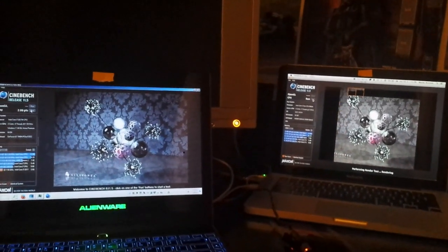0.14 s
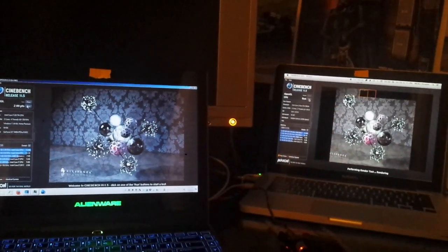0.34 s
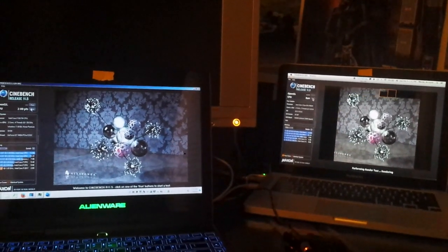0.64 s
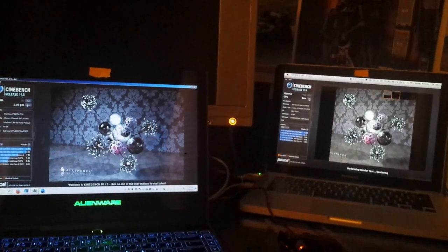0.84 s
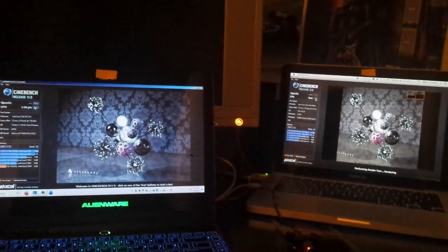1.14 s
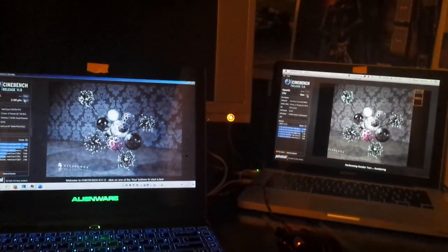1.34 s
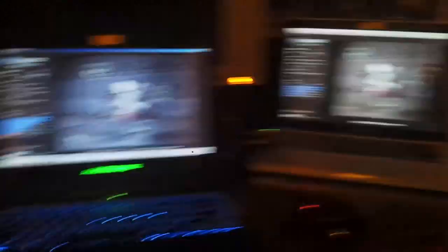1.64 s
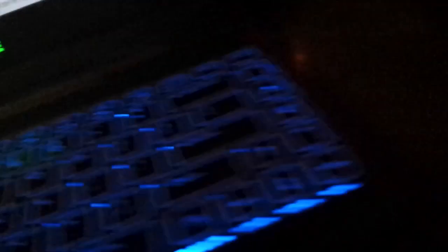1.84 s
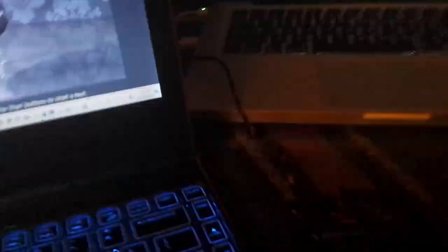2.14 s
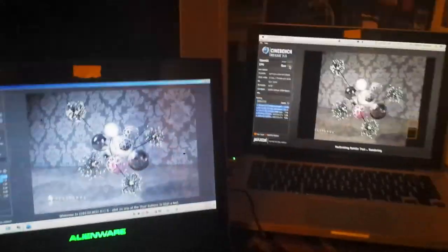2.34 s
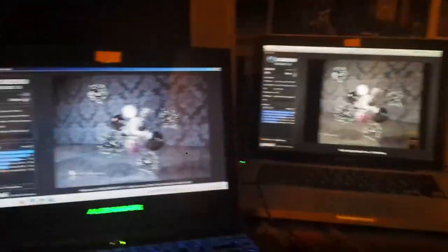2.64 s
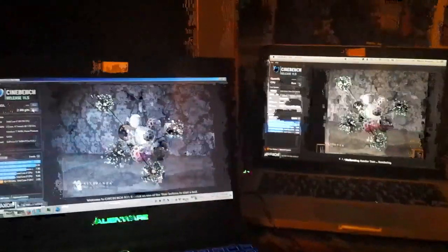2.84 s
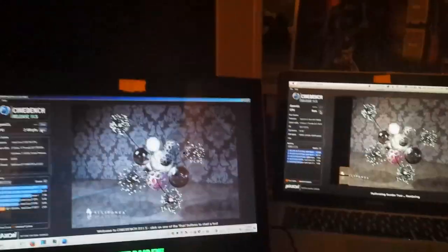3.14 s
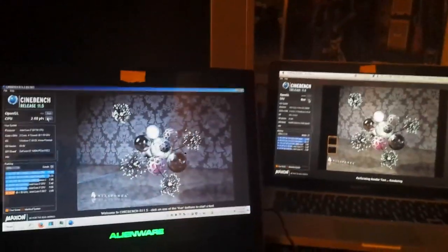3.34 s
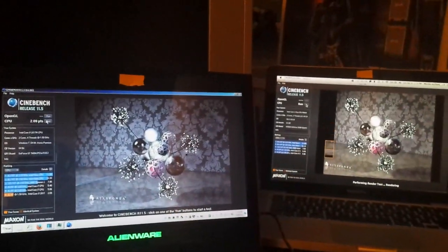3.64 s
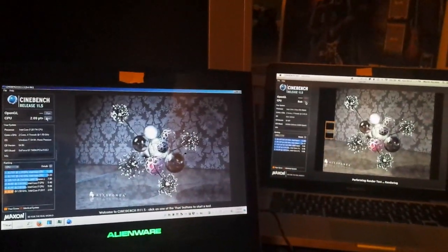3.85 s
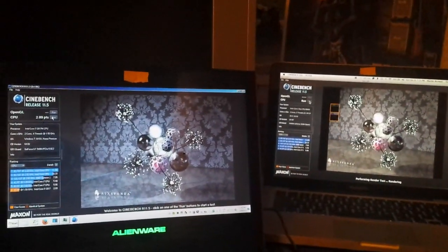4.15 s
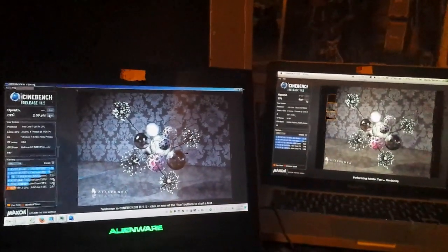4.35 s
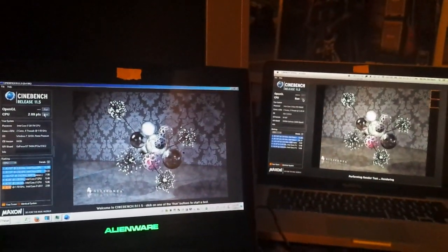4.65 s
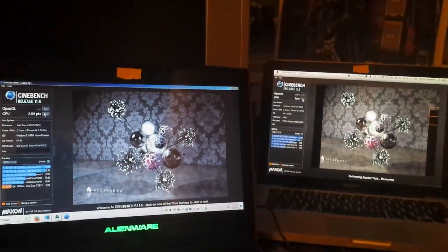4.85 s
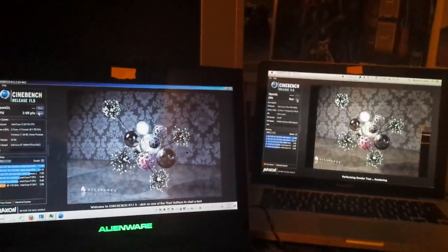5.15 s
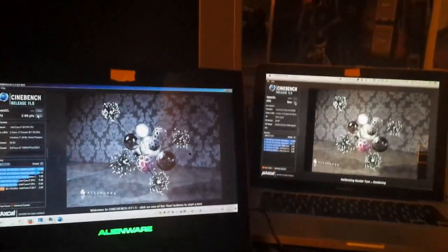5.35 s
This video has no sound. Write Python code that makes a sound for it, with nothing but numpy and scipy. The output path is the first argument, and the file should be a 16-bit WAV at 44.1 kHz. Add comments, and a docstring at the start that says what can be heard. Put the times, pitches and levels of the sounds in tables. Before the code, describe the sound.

Two laptop fans under heavy load run continuously, close to a hand-held camera in a quiet, fairly dry room. Broad airy hiss carries thin steady whines, a middle pair beating rapidly, with higher pitches above. From 1.1 to 1.6 s there are only very faint soft finger bumps and a tiny tick. At 1.7 s a sharp plastic click starts the camera's swoop; a strong tick follows at 1.84 s, then rubbing, scuffs, dull bumps and small clicks crowd together until about 2.65 s. Meanwhile the hiss changes colour, the whines dip and move between sides, and louder handling briefly ducks everything. Afterwards the fans settle, slightly thinner and with a weaker middle whine. A tick sounds right of centre at 3.1 s. Around 4 s a quiet tone glides down and throbs against its neighbour. Small clicks and a very short creak come at 4.6 to 4.85 s, then steady fans to the end at about 5.5 s.

```python
"""Two laptops under full load blow their fans in a quiet room, close to a hand-held camera.
Turbulent air hisses through resonant vents; blade tones whine, and tones of nearly equal pitch beat.
One blade tone glides down and throbs against its neighbour.
The camera swoops to a keyboard and settles farther back, which reshapes the hiss and the whines.
Its case ticks (struck modes), bumps, rubs (tiny catches) and creaks (stick-slip) in the hand."""
import sys
import numpy as np
from scipy import signal
from scipy.fft import rfft, irfft
from scipy.io import wavfile

SR = 44100
rng = np.random.default_rng(int(sys.argv[2]) if len(sys.argv) > 2 else 0)


def int16_out(signal):
    """Quantize to a 16-bit WAV file."""
    q = np.round(np.clip(np.atleast_2d(signal).T, -1, 1) * 32767)
    wavfile.write(sys.argv[1], SR, q.astype(np.int16))


N = 242991
TIME, FREQS = np.arange(N) / SR, np.fft.rfftfreq(N, 1 / SR)

# the camera's path:
# (time [s], place [1 = first, 0 = second], closeness to the keyboard [0-1])
CAMERA_PATH = [(0, 0.99, 0.14), (1.7, 0.97, 0.17), (1.85, 1, 1), (2.0, 0.39, 0.8), (2.33, 0.034, 0.97),
               (2.5, 0.031, 0.7), (2.75, 0.081, 0.52), (3.2, 0, 0.3), (5.0, 0, 0.14), (5.5, 0.089, 0.3)]


def gain_of(db):
    """Level law: amplitude is ten to the power of decibels over twenty."""
    return 10 ** (np.asarray(db) / 20)


def evened(x):
    """Normalisation to unit rms, the root of the mean power."""
    return x / np.sqrt(np.mean(x ** 2) + 1e-20)


def spectrum(points, hz=FREQS):
    """Spectral envelope: each column of a table interpolated along log frequency."""
    table_hz, *columns = np.transpose(points)
    return np.squeeze([np.interp(np.log(hz + 1), np.log(table_hz), c) for c in columns])


def curve(rows, t=TIME):
    """Time envelope: each column of a table interpolated along time."""
    s, *columns = np.transpose(rows)
    return np.squeeze([np.interp(t, s, c) for c in columns])


def sides(pan_db):
    """Level-difference stereo: left and right gains half the difference above and below."""
    return gain_of([[pan_db / 2], [-pan_db / 2]])


def add(mix, s, sound, pan_db=0):
    """Superposition: adds a mono sound at a time in seconds and a left-right difference in dB."""
    part = mix[:, round(s * SR):][:, :len(sound)]
    part += sides(pan_db) * sound[:part.shape[1]]


def drift(rate_hz):
    """Low-passed noise: a slow random motion of about unit rms, weak above its rate."""
    coarse = rng.standard_normal(N // 100)
    hz = np.fft.rfftfreq(len(coarse), TIME[-1] / len(coarse))
    slow = irfft(rfft(coarse) / (1 + (hz / rate_hz) ** 2), len(coarse))
    return np.interp(TIME, np.linspace(0, TIME[-1], len(slow)), evened(slow - slow.mean()))


def ring(hz, t60):
    """Damped mode: a sinusoid whose exponential decay loses 60 dB in t60 seconds."""
    t = TIME[:SR // 10]
    return np.sin(2 * np.pi * hz * t) * np.exp(-np.log(1000) * t / t60)


def minimum_phase(points, size=512):
    """Minimum phase: the Hilbert transform of log gain gives the most front-loaded impulse."""
    hz = abs(np.fft.fftfreq(size, 1 / SR))
    log_gain = np.log(gain_of(spectrum(points, hz)))
    pulse = np.fft.ifft(np.exp(np.conj(signal.hilbert(log_gain)))).real
    return pulse / abs(pulse).max()


def thinned(x, hz):
    """Radiation efficiency: small plastic parts radiate almost no bass."""
    return signal.sosfilt(signal.butter(3, hz, "highpass", fs=SR, output="sos"), x)


def room(x, t60=0.17, wet_db=-17):
    """Reverberation: desk and walls scatter a short, faint, exponentially decaying tail."""
    t = TIME[:SR // 3]
    decay = np.exp(-np.log(1000) * t / t60)
    tail = rng.standard_normal((2, len(t))) * decay * (t > .004)  # 4 ms before the first scatter
    tail /= np.linalg.norm(tail[0])
    return x + gain_of(wet_db) * signal.fftconvolve(x, tail, axes=1)[:, :N]


def creak(pan_db=1, jitter=.04):
    """Stick-slip: jerks of the grip ring the case, slowing and weakening as strain is spent."""
    # modes of the case: (frequency [Hz], t60 [s], relative level [dB])
    case_modes = [(970, .02, -10), (1280, .007, 0), (1730, .009, 0), (2380, .006, -16), (3600, .004, -21)]
    start_s, length_s = 4.7288, .0172
    first_per_s, last_per_s = 658, 260  # rate of the slips
    first_db, fade_db = -11, -9.5  # peak of a slip before bass thinning, and its change by the end
    knee = 2.5  # higher = the slips hold steady for longer

    body = sum(gain_of(db) * ring(hz, t60) for hz, t60, db in case_modes)
    body = np.convolve(body, signal.windows.hann(13))  # softens each jerk
    body = body / abs(body).max()
    out, since = np.zeros((2, N)), 0
    while since < length_s:
        spent = (since / length_s) ** knee
        add(out, start_s + since, gain_of(first_db + fade_db * spent) * body, pan_db)
        slips_per_s = first_per_s + (last_per_s - first_per_s) * spent
        since += np.exp(jitter * rng.standard_normal()) / slips_per_s
    return out


def bumps(low_hz=290, high_hz=390, t60=0.059, soft_s=0.0044, pan_db=2):
    """Soft impact: a slow contact lets fingertips excite two low modes of the camera."""
    # soft bumps of the fingers: (time [s], gain on the two modes [dB])
    touches = [(1.093, -46), (1.253, -38), (1.527, -42), (1.606, -34.5), (1.839, -54), (2.014, -37),
               (2.095, -30), (2.168, -41), (2.321, -41), (2.63, -49)]
    out = np.zeros((2, N))
    onset = 1 - np.exp(-TIME[:SR // 10] / soft_s)
    thud = (ring(low_hz, t60) + ring(high_hz, t60)) * onset
    for s, db in touches:
        add(out, s, gain_of(db) * thud, pan_db)
    return out


def pressure():
    """Power addition of strokes and grip: finger force as a level [dB] and its side [dB]."""
    # fingers sliding on the case:
    # (start [s], length [s], force level [dB], left-right difference [dB])
    strokes = [(1.659, .02, -44.5, 2), (1.697, 0.094, -46.5, -1), (1.837, .002, -39, -1),
               (1.88, 0.032, -43, 1), (1.945, 0.085, -39.5, 0.5), (2.047, 0.019, -34.5, 0.5),
               (2.095, 0.068, -43.5, 1), (2.206, .004, -40, 0), (2.423, .06, -45.5, 2),
               (2.507, 0.041, -42.5, 6.5), (2.574, 0.054, -46, 5.5), (4.6, 0.0035, -45.5, -2),
               (4.677, 0.013, -42, 0), (4.826, 0.02, -44, 0)]
    attack_s, release_s = 0.0047, 0.017  # a stroke bites quickly and lets go more slowly
    grip_db, grip_middle_s, grip_width_s = -49, 1.98, 0.35  # the whole hand shifts in the swoop

    forces = []
    for s, length, db, _ in strokes:
        rise = np.minimum(TIME - s, 0) / attack_s
        fall = np.maximum(TIME - s - length, 0) / release_s
        forces.append(gain_of(db) * np.exp(rise - fall))
    power = np.array(forces) ** 2
    grip = gain_of(grip_db) * np.exp(-((TIME - grip_middle_s) / grip_width_s) ** 2)
    total = power.sum(0) + grip ** 2 + 1e-12
    pan_db = np.transpose(strokes)[-1] @ power / total  # weighted by each stroke's power
    return 10 * np.log10(total), pan_db


def rub(grains_per_s=900, spread_db=1.3, patchy_db=3.0, ring_cycles=12, apart=0.52,
        brighten=0.19, light_db=-46, count=16):
    """Friction as shot noise: skin catches on plastic ring briefly, brighter under firmer force."""
    # colour of the rubbing: (frequency [Hz], relative level [dB])
    rub_colour = [(140, -28.5), (300, -16), (550, -8.5), (900, 1), (1600, -1), (3200, 4.5), (5500, -1.5),
                  (8000, 0.5), (14000, 1)]
    level_db, pan_db = pressure()
    out = np.zeros((2, N))
    for hz in np.geomspace(150, 13000, count):
        catches = np.zeros((2, N))
        at = np.nonzero(rng.random((2, N)) < grains_per_s / SR)
        when = at[1]
        size_db = spread_db * np.minimum(rng.exponential(1, len(when)), 4)
        size_db += patchy_db * drift(25)[when]
        catches[at] = gain_of(size_db) * rng.choice([-1, 1], len(size_db))
        force_db = level_db[when]
        press_db = force_db + brighten * (force_db - light_db) * np.log10(hz / 1000)
        catches[at] = evened(catches)[at] * gain_of(press_db + spectrum(rub_colour, hz))
        grain = thinned(ring(hz, ring_cycles / hz), hz / 2)
        grain /= np.linalg.norm(grain)
        out += signal.oaconvolve(catches, grain[None])[:, :N] / np.sqrt(count)
    middle, side = out[0], apart * out[1]
    return gain_of([pan_db / 2, -pan_db / 2]) * np.array([middle + side, middle - side])


def ticks():
    """Impact: each tick is a broadband snap and one briefly ringing mode of plastic."""
    # ticks of the camera's case: (time [s], ring gain [dB], ring frequency [Hz], ring t60 [s],
    # snap gain [dB], left-right difference [dB])
    taps = [(1.410, -37, 686, 0.016, -52, 3), (1.684, -12.5, 1400, 0.0055, -17.5, -8.5),
            (1.836, -7.5, 2330, 0.004, -31, 1), (1.8394, -22, 1660, 0.013, -42, 5),
            (1.888, -30.5, 890, 0.031, -44, 0), (1.948, -23.5, 1140, 0.0048, -26, 6),
            (2.0243, -20, 920, 0.014, -35, -5), (2.029, -26, 1670, 0.011, -36, 3),
            (2.138, -34, 1900, 0.019, -27, 1.5), (2.151, -33.5, 3060, 0.015, -40, 0),
            (2.209, -41, 1870, .02, -33, 1), (2.467, -25, 940, 0.0054, -31, -18),
            (2.509, -24.5, 1560, 0.0036, -40, 15), (2.549, -30, 2520, 0.0052, -29, 18),
            (2.6167, -22.5, 1510, 0.0026, -28, 20), (3.1111, -19, 1520, 0.0023, -20.5, 14.5),
            (3.142, -32.5, 1100, 0.0068, -48, 7), (4.599, -37, 2000, .01, -26, 2),
            (4.6764, -19.5, 2480, 0.0042, -42, 0), (4.8215, -18, 3060, 0.0021, -18.5, 1.5),
            (4.8233, -25.5, 1494, 0.03, -17.5, .5)]
    # colour of the snap: (frequency [Hz], relative level [dB])
    snap_colour = [(150, -39), (450, 2), (1500, 12.5), (3500, 6.5), (5000, 2), (8000, 1.5), (11500, -10.5),
                   (15500, -9.5)]
    out, snap = np.zeros((2, N)), minimum_phase(snap_colour)
    for s, ring_db, hz, t60, snap_db, pan_db in taps:
        add(out, s, gain_of(ring_db) * ring(hz, t60), pan_db)
        add(out, s, gain_of(snap_db) * snap, pan_db)
    return out


def air(flutter_db=0.87):
    """Turbulent noise filtered by vent resonances; its colour follows the camera's place."""
    # basic rush: (frequency [Hz], part common to both microphones [dB per Hz],
    # part of their difference [dB per Hz])
    rush = [(30, -106, -107), (68.4, -108, -109), (130, -108, -109), (222, -100, -102), (337, -92, -100.5),
            (534, -92, -96.5), (885, -92, -94), (1030, -85, -110), (1270, -91.5, -87), (2060, -90, -99.5),
            (2850, -89, -88), (4180, -92, -100), (8200, -94, -93.5), (15100, -93.5, -94)]
    # resonances of the vents: (frequency [Hz], width [Hz], boost of the common part [dB])
    vents = [(619, 130, 3.5), (1590, 630, 6), (1840, 140, 7.5), (2282, 390, 7.5), (2618, 460, 8.5),
             (3950, 910, 4.5), (6200, 1100, 2), (9800, 500, 1.5)]
    # extra rush at the camera's first place: (frequency [Hz], boost [dB])
    near_boost = [(40, 14), (130, 11.5), (330, 3.5), (900, 2), (1300, 3.5), (1900, 1.5), (2500, 2.5),
                  (3300, 0), (4200, 3), (5700, 2.5), (6400, 5.5), (7400, 1.5), (9300, 3), (11000, 1),
                  (15000, 1)]
    # change of the rush just above the keyboard: (frequency [Hz], boost [dB])
    keys_boost = [(60, 18.5), (170, 7.5), (700, 0), (1300, -0.5), (1650, 3), (2300, -7.5), (2700, -1.5),
                  (3100, 6), (3600, 3.5), (4200, -2.5), (6000, 1.5), (12000, 0.5)]

    colour = spectrum(rush)
    for hz, width, db in vents:
        colour[0] += db / (1 + (2 * (FREQS - hz) / width) ** 2) ** 2
    flow = rfft(rng.standard_normal((2, N))) * gain_of(colour) * np.sqrt(SR / 2)
    far = irfft(flow, N)
    first = irfft(flow * gain_of(spectrum(near_boost)), N)
    over_keys = irfft(flow * gain_of(spectrum(keys_boost)), N)

    near, keys = curve(CAMERA_PATH)
    off_keys = far + near * (first - far)
    common, apart = (1 - keys) * off_keys + keys * over_keys
    return np.array([common + apart, common - apart]) * gain_of(flutter_db * drift(20))


def slowing_fan(pan_db=0.0):
    """Beating: a fan throttles back, its tone gliding to throb against the tone just above."""
    from_hz, to_hz = 960, 813.3
    start_s, glide_s, rise_s = 3.98, .33, .1
    level_db = -62.5  # rms, once risen
    since = np.maximum(TIME - start_s, 0)
    eased = np.sin(np.pi / 2 * np.minimum(since / glide_s, 1)) ** 2
    hz = from_hz + (to_hz - from_hz) * eased
    level = gain_of(level_db) * np.minimum(since / rise_s, 1)
    return sides(pan_db) * level * np.sqrt(2) * np.sin(2 * np.pi * np.cumsum(hz) / SR)


def whines(wander=.0003, flutter_db=1.0, fuzz=0.034, trim_db=0.3):
    """Blade and motor tones: speed modulates frequency, rough inflow modulates phase and level."""
    # fan tones; the pair near 965 Hz beats: (frequency [Hz], level at the first place [dB before trim],
    # level at the second [dB before trim], left-right difference [dB], share of the shielding [0-1])
    tones = [(311.8, -64, -65.5, 1.5, 0), (474, -73, -73, 0, 0), (826.6, -64, -64, 1.5, 0),
             (960.0, -56, -57.5, 1.5, .2), (971.4, -47.1, -56.3, 2, .3), (1440, -67, -67, 0, .5),
             (1559.3, -45.8, -48.3, -3.7, 1), (2880, -68, -69, 0, .3), (3119, -72, -71, 0, 1),
             (3840, -66, -70, 0, .3), (4054, -49.5, -50.5, 0, .8), (4678, -76, -73, 0, 1),
             (5013, -65, -72, 0, 1), (5974, -77, -73, 0, 1), (6572, -67, -76, 0, 1),
             (9352.6, -67, -79, 0, .5)]
    # shielding of the beamed tones while the camera swoops: (time [s], left [dB], right [dB])
    shielding = [(1.72, -0.5, -2), (1.85, -6.5, -17), (2.02, -2.5, -16), (2.15, 1.5, -16.5),
                 (2.32, -16, -8), (2.46, -2, 0), (3.2, -2.5, -1.5), (4.4, 0, 0.5)]
    lead_per_db = .14  # phase lead of the nearer microphone [radians per dB of level difference]

    near, shade = curve(CAMERA_PATH)[0], curve(shielding)
    out = np.zeros((2, N))
    seconds_turned = np.cumsum(1 + wander * drift(1.47)) / SR  # time warped by the fan speed
    for hz, first_db, second_db, pan_db, beamed in tones:
        phase = 2 * np.pi * hz * seconds_turned + fuzz * drift(40)
        lead = lead_per_db * pan_db * np.array([[.5], [-.5]])  # the louder side hears it earlier
        place_db = second_db + near * (first_db - second_db)
        level_db = place_db + beamed * shade + flutter_db * drift(36)
        tone = np.sqrt(2) * np.sin(phase + lead)
        out += sides(pan_db) * gain_of(level_db + trim_db) * tone
    return out


def scene():
    """Superposition of the fans and the hand on the camera."""
    handling = room(thinned(ticks(), hz=400))
    handling = handling + thinned(bumps(), hz=250) + thinned(creak(), hz=830) + rub()
    return sides(pan_db=1.1) * air() + whines() + slowing_fan() + handling


def record(dry, threshold_db=-31, squeeze=0.29, recover_db_per_s=12, lag_s=0.012):
    """Compression: loud handling ducks the whole mix, which recovers slowly; then a low-pass."""
    keep = np.exp(-1 / (lag_s * SR))
    power = signal.lfilter([1 - keep], [1, -keep], (dry ** 2).mean(0))
    power_db = 10 * np.log10(power + 1e-12)
    fall = TIME * recover_db_per_s
    held_db = np.maximum.accumulate(power_db + fall) - fall  # peaks held, falling at a steady rate
    over_db = np.maximum(held_db - threshold_db, 0)
    ducked = dry / gain_of(squeeze * signal.lfilter([1 - keep], [1, -keep], over_db))
    edge = signal.firwin(511, 15820, window=("kaiser", 9), fs=SR)  # cutoff in Hz
    return signal.oaconvolve(ducked, edge[None], "same")


dry = scene()
out = record(dry)
int16_out(out)
```